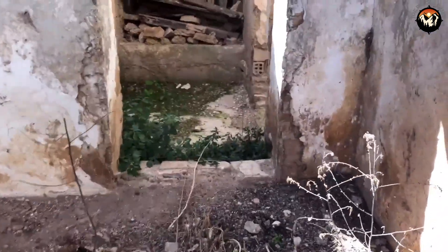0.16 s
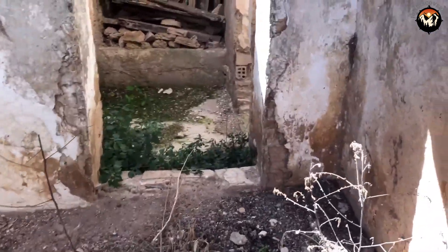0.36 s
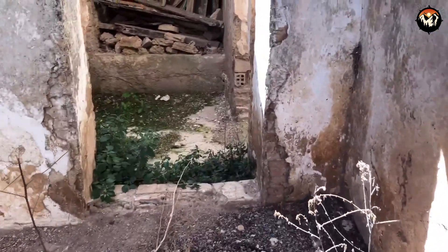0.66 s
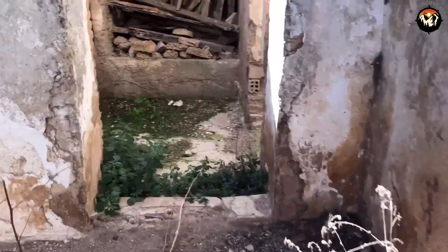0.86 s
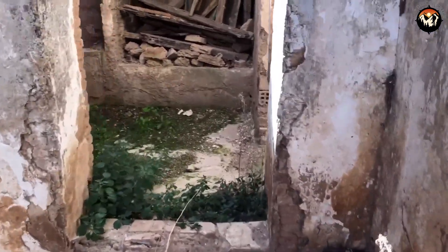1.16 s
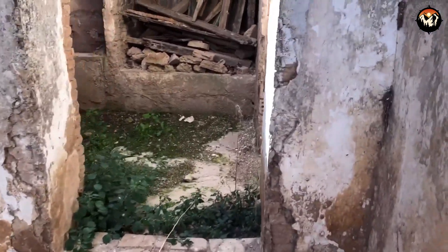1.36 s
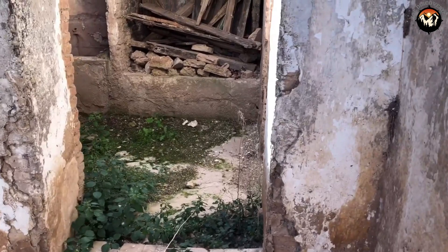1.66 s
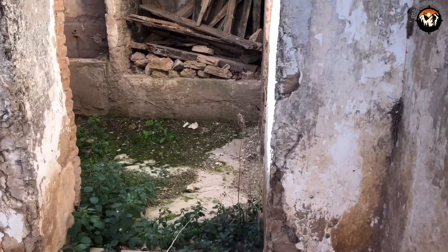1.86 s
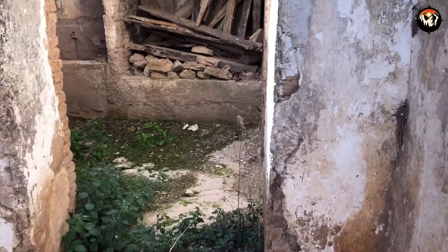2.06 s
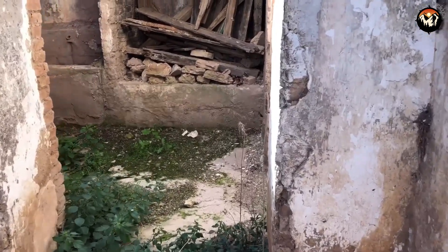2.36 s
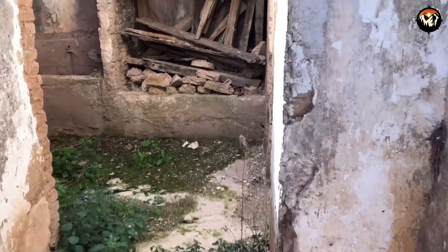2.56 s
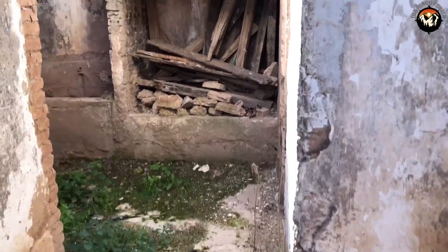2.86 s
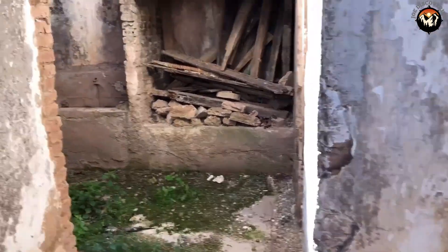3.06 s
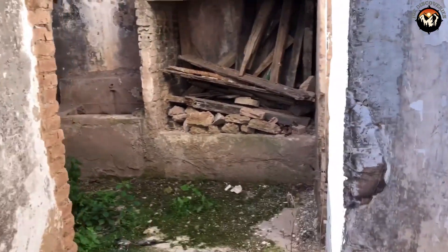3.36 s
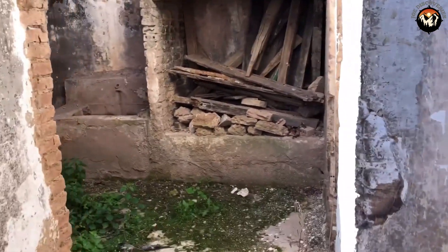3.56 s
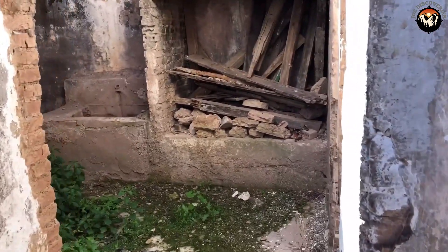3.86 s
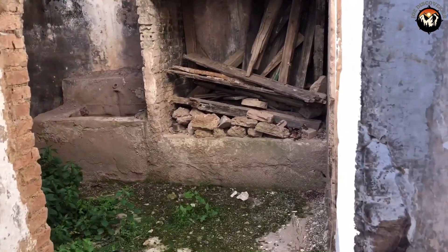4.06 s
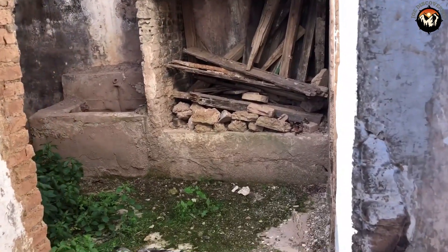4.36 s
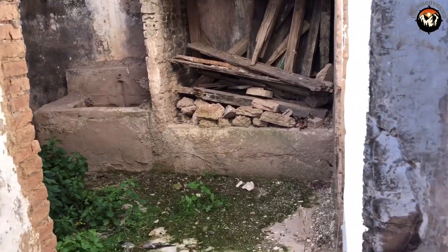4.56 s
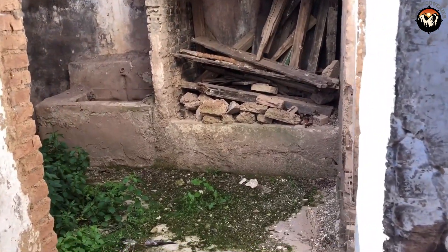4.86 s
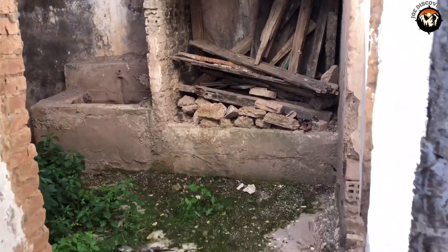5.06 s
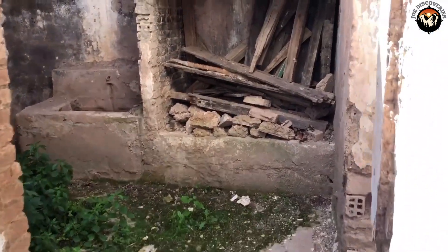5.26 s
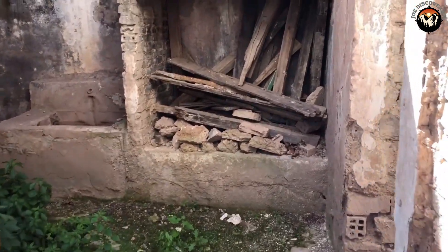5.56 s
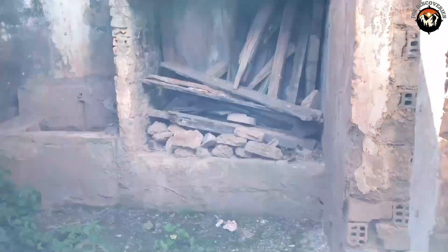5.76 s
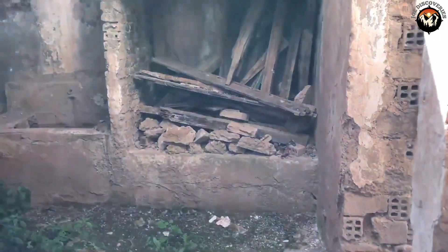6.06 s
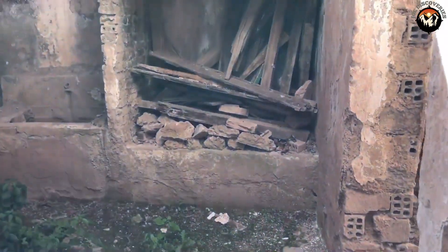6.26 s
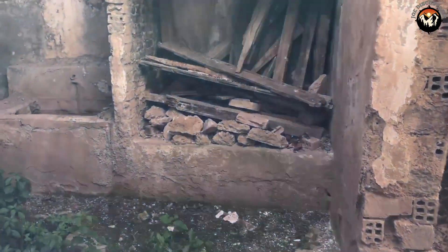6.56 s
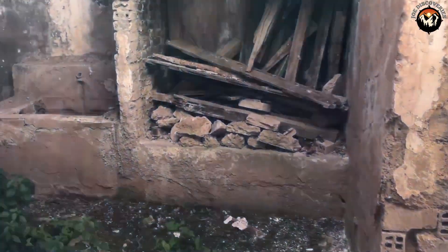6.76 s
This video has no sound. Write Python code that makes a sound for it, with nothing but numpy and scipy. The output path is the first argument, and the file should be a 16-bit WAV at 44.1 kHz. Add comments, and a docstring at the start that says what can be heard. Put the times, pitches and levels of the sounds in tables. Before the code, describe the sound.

Slow, close footsteps crunch over dry dirt, loose stones and dead weeds, with stalks snapping and stones knocking outdoors.

```python
"""Between ruined walls, slow close footsteps cross dry dirt, loose stones and dead weeds.
Each sole crushes weeds and grit into crackle while the heel thumps the soil. Stones grind and knock,
stalks snap and small things scrape; the walls briefly answer the knocks and snaps.
A far engine drones under outdoor air. The sound stops dead shortly after six seconds."""
import sys
import numpy as np
from scipy import signal
from scipy.fft import rfft, irfft, next_fast_len
from scipy.io import wavfile
from scipy.ndimage import uniform_filter1d, map_coordinates

SR = 44100
rng = np.random.default_rng(int(sys.argv[2]) if len(sys.argv) > 2 else 0)


def transcribe(signal):
    """Save signal, clipped to [-1, 1], as a 16-bit WAV file at the path in sys.argv[1]."""
    frames = np.atleast_2d(signal).T
    limited = np.clip(frames, -1, 1)
    pcm = np.round(limited * 32767).astype(np.int16)
    wavfile.write(sys.argv[1], SR, pcm)


N = 304422
BLOW_SAMPLES, LEAD_SAMPLES = 1024, 128  # length of one blow; its run-up to the peak


def amp(db):
    """Decibels to gain."""
    return 10 ** (np.asarray(db) / 20)


def unit(x):
    """x scaled to rms 1."""
    return x / np.sqrt(np.mean(x ** 2) + 1e-20)


def along(points, hz):
    """Reads (Hz, value) points on a log frequency axis."""
    freqs, values = np.transpose(points)
    return np.interp(np.log(hz + 1), np.log(freqs + 1), values)


def wobble(rate):
    """A smooth random curve, rate knots a second."""
    knots = rng.standard_normal(int(N * rate / SR) + 4)
    return map_coordinates(knots, [np.arange(N) * rate / SR])


def filtered(x, response):
    """x through a complex frequency response."""
    size = next_fast_len(x.shape[-1] + 8192)
    return irfft(rfft(x, size) * response(np.fft.rfftfreq(size, 1 / SR)), size)[..., :x.shape[-1]]


def coloured(x, spectrum):
    """x shaped by (Hz, dB) points, rms 1."""
    return unit(filtered(x, lambda hz: amp(along(spectrum, hz))))


def resonance(f, hz, width_hz):
    """The response at frequencies f of one damped mode centred on hz."""
    return 1j * f * width_hz / (hz * hz - f * f + 1j * f * width_hz + 1e-9)


def blow(rise, t60):
    """The force of one contact: a quick build-up to the peak, then a decay."""
    t = (np.arange(BLOW_SAMPLES) - LEAD_SAMPLES) / SR
    return np.where(t < 0, np.exp(-(t / rise) ** 2), amp(-60 * t / t60))


def grains(per_s, t60, spread_db, hiss, clump_db):
    """White crackle: random noise bursts of uneven size, in clumps, over a bed of hiss."""
    onsets = rng.random(N) < per_s / SR
    sizes = amp(spread_db * np.minimum(rng.exponential(size=N), 3.5))
    envelope = unit(signal.fftconvolve(onsets * sizes, blow(rise=0.0013, t60=t60))[:N])
    clumps = amp(clump_db * wobble(40))
    return unit((envelope + hiss) * clumps * rng.standard_normal(N))


def mottled(x, depth_db):
    """Every fragment has its own pitch: brief narrow patches of the spectrum stand out."""
    spectra = signal.stft(x, nperseg=512)[2]
    patches = uniform_filter1d(rng.standard_normal(spectra.shape), size=3, axis=0)
    patches = unit(uniform_filter1d(patches, size=3, axis=1))
    return unit(signal.istft(spectra * amp(depth_db * patches), nperseg=512)[1][:N])


def swells(rows, rest_db):
    """Gain of (peak s, build-up s, die-away s, dB) swells over a resting level; flanks span 20 dB."""
    t, power = np.arange(0, N, 32) / SR, amp(2 * rest_db)
    for at, build, fade, db in rows:
        drop_db = 20 * np.maximum((at - t) / build, (t - at) / fade)
        power = power + amp(2 * (db - drop_db))
    return np.interp(np.arange(N) / SR, t, np.sqrt(power))


def place(out, at, db, sound):
    """Lays one hit into out, peaking at the given time and level."""
    start = round(at * SR) - np.abs(sound).argmax()
    out[start:][:len(sound)] += amp(db) * sound / np.abs(sound).max()


def air():
    """A gently wavering outdoor wash, darker toward the treble."""
    # tone of the open air: (frequency [Hz], relative level [dB])
    spectrum = [(20, -35.5), (42, -12), (65, 1), (90, -5.5), (220, -8), (600, -19), (1200, -15.5),
                (2700, -21), (6000, -27), (16000, -38)]
    return amp(-61 + 1.1 * wobble(4.7)) * coloured(rng.standard_normal(N), spectrum)


def engine():
    """A far engine's firing tone and its octave, wavering with the air between."""
    # the drone's course: (time [s], firing rate [Hz], fundamental level [dB], octave level [dB])
    course = [(0, 63, -75, -80), (.35, 64.1, -61, -91), (.9, 69.9, -70, -94.5), (1.6, 65, -63, -85),
              (2.7, 64.3, -63.5, -88), (3.2, 68.5, -67.5, -64.5), (3.6, 73.4, -62, -72),
              (4.15, 73, -63.5, -71), (4.7, 75.8, -59.5, -77.5), (5.4, 74, -65, -89.5),
              (5.6, 71.8, -62, -61.5), (6.05, 72.16, -61.5, -59.5), (6.28, 71, -53, -69)]
    times, *columns = np.transpose(course)
    hz, fundamental_db, octave_db = [np.interp(np.arange(N) / SR, times, c) for c in columns]
    phase = 2 * np.pi * np.cumsum(hz + 1.5 * wobble(21)) / SR
    fundamental = amp(fundamental_db + 2 * wobble(16)) * np.sin(phase)
    octave = amp(octave_db + wobble(4.4)) * np.sin(2 * phase)
    return np.sqrt(2) * (fundamental + octave)


def sole_crunch():
    """Under the sole, thin stalks crackle bright and grit fractures lower."""
    # presses of the sole: (peak time [s], build-up [s], die-away [s], weeds level [dB], grit level [dB])
    presses = [(0, .05, 0.26, -44, -49.5), (.174, 0.22, 0.4, -50.5, -54), (.38, 0.041, 0.12, -61, -53),
               (0.679, 0.02, 0.06, -64, -53), (.74, 0.11, 0.67, -87, -57.5), (.8, 0.03, 0.19, -47, -54.5),
               (.932, 0.072, 0.15, -44, -48), (1.076, 0.019, 0.5, -60, -55),
               (1.184, 0.026, 0.045, -42, -51), (1.303, 0.19, 0.075, -57, -58),
               (1.42, 0.24, 0.42, -67.5, -59), (1.604, 0.19, 0.16, -54.5, -54),
               (1.765, 0.12, 0.13, -55, -55), (1.9, 0.15, 0.6, -65.5, -57.5),
               (2.014, 0.079, 0.24, -48, -57), (2.149, 0.049, 0.14, -43.5, -49.5),
               (2.216, 0.034, 0.14, -42, -42), (2.33, 0.039, 0.53, -51.5, -51.5),
               (2.523, 0.06, 0.07, -36.5, -48.5), (2.696, 0.099, 0.38, -65, -67),
               (2.884, 0.076, 0.16, -51, -44.5), (3.1, 0.25, 0.17, -77, -51.5),
               (3.164, 0.026, 0.14, -33, -43.5), (3.234, 0.083, 0.096, -36, -44),
               (3.388, 0.038, 0.07, -45, -50), (3.479, .08, 0.16, -50.5, -55),
               (3.605, 0.088, 0.43, -45.5, -49), (3.782, 0.1, 0.26, -32.5, -47.5),
               (3.86, .15, .1, -60, -47.5), (3.903, 0.078, 0.045, -63, -37.5),
               (3.96, 0.029, 0.13, -41.5, -45.5), (4.033, .05, 0.24, -48, -54),
               (4.27, 0.24, 0.43, -55, -54), (4.565, 0.039, 0.11, -51, -61), (4.614, 0.03, 0.015, -43, -67),
               (4.679, 0.092, 0.05, -49, -58), (4.737, .05, 0.066, -47.5, -54),
               (4.804, 0.062, 0.34, -48, -50.5), (5.019, 0.036, 0.18, -42, -45),
               (5.151, 0.073, 0.17, -38, -52), (5.214, 0.046, 0.12, -28, -30),
               (5.25, 0.13, 0.034, -38, -33.5), (5.355, 0.26, 0.13, -36.5, -39.5),
               (5.541, 0.14, 0.13, -41, -48.5), (5.75, 0.16, 0.63, -55.5, -52),
               (5.832, 0.034, 0.13, -47, -42), (6.082, 0.17, 0.37, -48.5, -52.5)]
    # tone of dry weeds: (frequency [Hz], relative level [dB])
    weed_spectrum = [(800, -74), (2500, -23), (4500, -6), (7000, -5.5), (11000, -5), (16000, -6.5)]
    # tone of grit: (frequency [Hz], relative level [dB])
    grit_spectrum = [(250, -66), (900, -9), (2000, -7), (3500, -5.5), (5500, -9.5), (9000, -16.5)]
    weeds = coloured(grains(per_s=320, t60=0.021, spread_db=8, hiss=1.3, clump_db=0.5), weed_spectrum)
    grit = coloured(grains(per_s=970, t60=0.014, spread_db=3.5, hiss=0.48, clump_db=-0.53), grit_spectrum)
    at, build, fade, weeds_db, grit_db = np.transpose(presses)
    weeds_gain = swells(zip(at, build, fade, weeds_db), rest_db=-77)
    grit_gain = swells(zip(at, build, fade, grit_db), rest_db=-80)
    return weeds_gain * mottled(weeds, depth_db=2.5) + grit_gain * mottled(grit, depth_db=2)


def stone_grind():
    """Rubbing grains excite stones; the size of stone underfoot sets which resonance speaks."""
    # stones shifting: (peak time [s], build-up [s], die-away [s], level [dB], resonance [Hz])
    shifts = [(0, .1, 0.6, -54.5, 1450), (.17, .15, 0.13, -50.5, 1210), (0.733, 0.045, 0.11, -45.5, 1340),
              (.98, 0.053, 0.06, -45, 790), (1.0, 0.073, 0.13, -47, 885), (1.1, 0.027, 0.14, -53, 880),
              (1.2, 0.016, 0.11, -46.5, 750), (1.265, 0.026, 0.14, -51.5, 810),
              (1.302, 0.065, 0.071, -47.5, 910), (1.425, 0.15, 0.087, -48.5, 1020),
              (1.48, 0.05, 0.11, -48.5, 990), (1.545, 0.066, 0.12, -49, 960),
              (1.604, 0.044, 0.073, -43, 1210), (1.76, 0.63, 0.92, -55.5, 1080),
              (2.24, 0.041, 0.17, -49, 750), (2.49, 0.048, 0.17, -44, 1300), (2.58, 0.15, 0.27, -54, 1000),
              (2.92, 0.087, 0.12, -44.5, 1070), (3.087, 0.17, 0.14, -46.5, 1470),
              (3.22, .15, 0.18, -56, 1440), (3.377, 0.027, 0.12, -51.5, 1460),
              (3.604, 0.16, 0.1484, -54, 1610), (3.903, 0.033, 0.067, -40, 1114),
              (4.033, 0.043, 0.12, -45.5, 1380), (4.13, .2, 1, -60.5, 1420),
              (5.043, 0.051, 0.1, -55.5, 840), (5.1, 0.055, 0.53, -50.5, 1130),
              (5.234, 0.14, 0.1, -50, 1400), (5.369, 0.17, 0.072, -48, 849),
              (5.546, 0.092, 0.14, -49.5, 1130), (5.845, 0.52, 0.42, -60, 1126),
              (6.17, 0.11, 0.12, -53, 1460)]
    # stone sizes, large to small: (resonance [Hz])
    stone_modes = [760, 894, 1161, 1540]
    at, build, fade, db, ring_hz = np.transpose(shifts)
    rub = mottled(grains(per_s=250, t60=0.006, spread_db=2.2, hiss=1.8, clump_db=0.4), depth_db=1.2)
    out = np.zeros(N)
    for hz in stone_modes:
        off_size_db = 110 * np.log(ring_hz / hz) ** 2  # a stone speaks less the further its size is off
        gain = swells(zip(at, build, fade, db - off_size_db), rest_db=-76.5)
        out += gain * unit(filtered(rub, lambda f: resonance(f, hz, 0.47 * hz) ** 2))
    return out


def heel_thumps():
    """The heel loads packed soil in dull, lumpy thumps."""
    # heel falls: (peak time [s], die-away [s], level [dB])
    heels = [(.1, 0.25, -56.5), (.95, 0.036, -51), (.99, 0.078, -43.5), (1.3, 0.12, -48.5),
             (1.54, 0.068, -52.5), (2.476, 0.06, -48.5), (2.96, 0.55, -56), (3.19, 0.19, -52),
             (3.39, 0.046, -51), (3.604, 0.045, -47), (3.911, 0.16, -50), (5.05, 0.1, -52.5),
             (5.24, 0.21, -47.5), (5.54, 0.13, -55.5)]
    # tone of packed soil: (frequency [Hz], relative level [dB])
    spectrum = [(25, -64.5), (60, -15), (110, -3.5), (300, -2), (600, -5.5), (1000, -12), (3000, -68.5)]
    load = swells([(at, 0.86 * fade, fade, db) for at, fade, db in heels], rest_db=-61.5)
    return load * coloured(grains(per_s=110, t60=0.058, spread_db=1.2, hiss=1, clump_db=-2), spectrum)


def stone_knocks():
    """A few rough ms of contact ring a stone's damped lowest mode and a weaker, higher one."""
    # stones clacking together: (time [s], peak level [dB], ring [Hz])
    knocks = [(0.101, -27, 1500), (0.127, -35, 1410), (0.1454, -24.5, 1290), (0.338, -38, 1090),
              (0.3673, -39, 2030), (0.7346, -36, 1150), (0.9768, -27, 748), (0.999, -30.5, 890),
              (1.007, -38, 810), (1.056, -37, 820), (1.196, -31, 914), (1.2066, -35, 780),
              (1.218, -39, 754), (1.2598, -37, 2000), (1.3079, -40, 1030), (1.352, -40, 920),
              (1.419, -35, 990), (1.4744, -37, 970), (1.482, -42, 900), (1.538, -29.5, 1140),
              (1.546, -33, 870), (1.588, -38, 1050), (1.753, -33, 1380), (2.2165, -31, 2290),
              (2.2183, -31.5, 990), (2.2215, -26, 730), (2.222, -25, 2270), (2.238, -36, 2250),
              (2.2385, -39, 700), (2.244, -41, 2300), (2.2625, -35, 1010), (2.3199, -33.5, 1640),
              (2.415, -36, 1350), (2.4709, -22, 1247), (2.5, -26.5, 1660), (2.5884, -35.5, 900),
              (3.0268, -26, 1450), (3.0309, -26.5, 1420), (3.049, -40, 1700), (3.0737, -40, 1500),
              (3.1082, -42, 1900), (3.119, -44, 1800), (3.4798, -39.5, 1580), (3.6113, -27, 1690),
              (3.897, -25, 2947), (3.9042, -31, 1120), (3.954, -33.5, 1530), (4.018, -24.5, 1380),
              (4.021, -21, 1410), (4.023, -27, 1490), (4.1199, -31, 1400), (4.444, -40, 769),
              (4.804, -39.5, 1280), (5.038, -34, 1000), (5.218, -18, 3520), (5.223, -30.5, 1070),
              (5.2352, -28, 2290), (5.2948, -40, 2810), (5.33, -31, 1390), (5.5259, -29.5, 1460),
              (5.749, -32.5, 1190), (5.785, -40, 1300), (5.831, -32, 1810), (5.839, -36, 1090),
              (6.1746, -32.5, 1647), (6.2442, -39, 1774)]
    strike = blow(rise=0.001, t60=0.009)
    settling_grit = 0.04 * blow(rise=0.00085, t60=0.019)
    bursts = rng.standard_normal((len(knocks), BLOW_SAMPLES)) * (strike + settling_grit)
    bursts[:, LEAD_SAMPLES] += 22  # the sharp edge of the blow
    out = np.zeros(N)
    for (at, db, hz), burst in zip(knocks, bursts):
        low_mode = filtered(burst, lambda f: resonance(f, hz, 0.55 * hz) ** 2)
        high_mode = filtered(burst, lambda f: resonance(f, 3.1 * hz, hz) ** 2)
        place(out, at, db, low_mode - amp(-32) * high_mode)
    return out


def stalk_snaps():
    """A stalk breaks in a ragged burst: a bright, briefly ringing crack and a lower woody body."""
    # stalks breaking: (time [s], crack peak [dB], brightest frequency [Hz], body relative to crack [dB])
    snaps = [(0.125, -27.5, 11500, -6), (0.3672, -37, 7800, 4.5), (0.823, -29, 10400, -14),
             (0.9255, -8, 13100, -22), (0.9252, -25, 12000, -10), (0.9328, -17, 11660, -35),
             (1.07, -16, 13100, -46), (1.0766, -26, 9600, -22), (1.745, -39, 8850, -4),
             (1.7513, -38.5, 6000, -16), (1.87, -33, 3980, -10), (1.995, -28.5, 8560, -20),
             (2.016, -31, 7500, -22), (2.045, -31, 5770, -25), (2.073, -18.5, 14500, -18.5),
             (2.158, -19.5, 6400, -34), (2.21, -15, 14100, -7), (2.2175, -22, 11200, -8),
             (2.259, -24.5, 13100, -15), (2.321, -16.5, 8690, -11), (2.3259, -20.5, 6700, -10),
             (2.387, -25, 11200, -14), (2.415, -25.5, 9700, -10.5), (2.469, -9.5, 9000, -12),
             (2.4733, -18.5, 6440, -2), (2.5, -7, 10570, -26), (2.5045, -14.5, 10800, -19),
             (2.6923, -37, 10000, -1), (3.155, -17, 11500, -17.5), (3.172, -16.5, 10640, -17),
             (3.221, -23, 8500, -29), (3.223, -17, 5700, -46), (3.233, -16.5, 11300, -33),
             (3.356, -27.5, 9600, -11), (3.377, -34, 9000, -5.5), (3.384, -36, 10600, -10),
             (3.4014, -23.5, 9200, -8), (3.453, -32, 9500, -25), (3.48, -29, 12500, -12),
             (3.5123, -31.5, 8000, -5), (3.5557, -31, 10200, -9), (3.6115, -18.5, 13200, -9),
             (3.614, -22, 8900, -5), (3.755, -15, 10200, -28), (3.784, -12, 11000, -27),
             (3.92, -29, 4500, 1.5), (3.951, -24, 8200, -20), (3.9553, -15, 5850, -27),
             (4.034, -19, 12360, -41), (4.0375, -12, 13300, -31), (4.117, -34, 11500, -5),
             (4.259, -31.5, 8380, -12), (4.557, -30, 10400, -18), (4.56, -26, 9500, -18),
             (4.564, -28, 8140, -15), (4.6122, -27, 8000, -25), (4.7352, -32, 6170, -44),
             (4.8029, -17.5, 11500, -14.5), (5.1292, -16.5, 8780, -15), (5.1699, -24, 9480, -14),
             (5.186, -23, 6370, -7), (5.19, -15, 5440, -12), (5.2054, -18, 7900, -11),
             (5.2098, -9, 5500, -16), (5.2113, -17, 9000, -24), (5.2339, -13, 5800, -7),
             (5.2438, -26, 5000, -17), (5.335, -19.5, 5800, -22), (5.5838, -33.5, 4800, -4),
             (5.707, -34, 9300, -22), (6.17, -27.5, 10260, -18), (6.203, -30, 10600, -16),
             (6.2428, -27.5, 11700, -10)]
    tear_s = 0.0059  # from first contact until the stalk has torn through
    tearing = np.exp(-(np.arange(BLOW_SAMPLES) / SR / tear_s) ** 4)
    bursts = rng.standard_normal((len(snaps), 2, BLOW_SAMPLES)) * blow(rise=0.0004, t60=0.022) * tearing
    bursts[..., LEAD_SAMPLES] += 3.5  # the instant of fracture
    out = np.zeros(N)
    for (at, db, hz, body_db), (crack, body) in zip(snaps, bursts):
        fizz = filtered(crack, lambda f: 0.32 * (f > 3000) * np.minimum(f / hz, 1) ** 0.3)
        ring = filtered(crack, lambda f: resonance(f, hz, 0.6 * hz) + 0.5 * resonance(f, hz, 0.07 * hz))
        wood = filtered(body, lambda f: resonance(f, hz=2500, width_hz=3000) ** 2)
        place(out, at, db, fizz + ring)
        place(out, at, db + body_db, wood)
    return out


def scrapes():
    """Small things drag over stone: rough friction sings in one narrow band, swelling and fading."""
    # drags: (start [s], length [s], centre [Hz], width [Hz], level [dB])
    drags = [(0.7, 0.083, 2530, 1200, -48), (2.219, 0.0095, 700, 150, -41),
             (3.055, 0.052, 1531, 231.5, -55), (5.828, 0.034, 3560, 400, -48),
             (4.264, 0.064, 4159, 900, -54), (4.556, 0.068, 9400, 900, -54), (4.556, 0.091, 7760, 700, -55)]
    rub = grains(per_s=190, t60=0.008, spread_db=3, hiss=1.2, clump_db=2)
    t, out = np.arange(N) / SR, np.zeros(N)
    for start, length, hz, width_hz, db in drags:
        progress = np.clip((t - start) / length, 0, 1)
        arch = np.sqrt(np.sin(np.pi * progress).clip(0))
        out += amp(db) * arch * unit(filtered(rub, lambda f: resonance(f, hz, width_hz) ** 2))
    return out


def wall_echo(x):
    """The close roofless walls answer briefly, the upper mids dying first."""
    # decay between the walls: (frequency [Hz], time to fall 60 dB [s])
    decay_times = [(500, 0.089), (3000, 0.013), (12000, 0.069)]
    hz, t, noise = signal.stft(rng.standard_normal(SR // 4), SR, nperseg=256)
    decay = amp(-60 * t / along(decay_times, hz)[:, None])
    tail = signal.istft(noise * decay, SR, nperseg=256)[1]
    delayed = np.pad(x, (200, 0))
    return signal.fftconvolve(delayed, tail / np.linalg.norm(tail))[:N]


def scene():
    """Mono mix: sharp hits with their echo, dry ground textures, engine and air."""
    hits = stalk_snaps() + stone_knocks()
    ground = sole_crunch() + stone_grind() + scrapes() + heel_thumps()
    return (hits + amp(-11.5) * wall_echo(hits) + ground + engine() + air())[None]


def record(dry):
    """The sound stops dead, and a steep low-pass removes the very top."""
    end_s, top_hz = 6.2845, 15850
    gate = np.arange(N) < end_s * SR
    return filtered(dry * gate, lambda hz: 1 / (1 + (hz / top_hz) ** 200))


dry = scene()
out = record(dry)
transcribe(out)
```